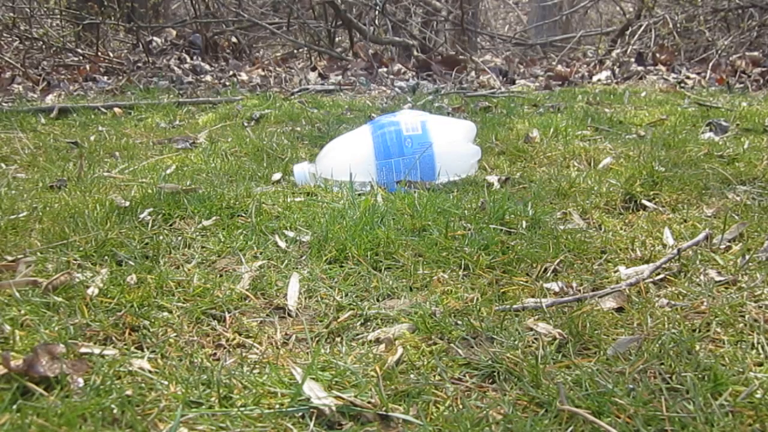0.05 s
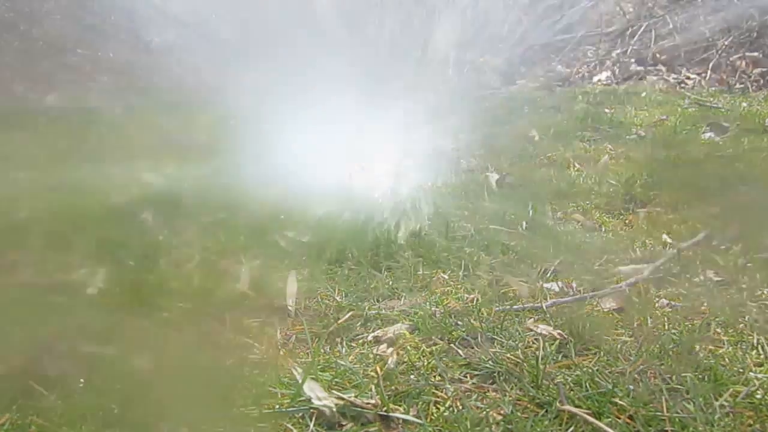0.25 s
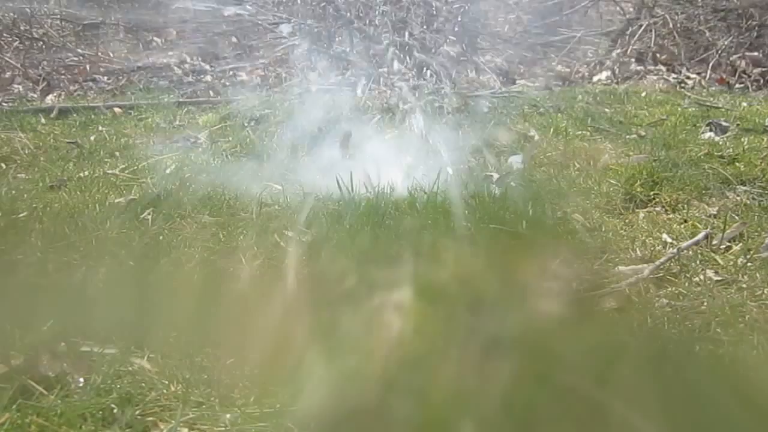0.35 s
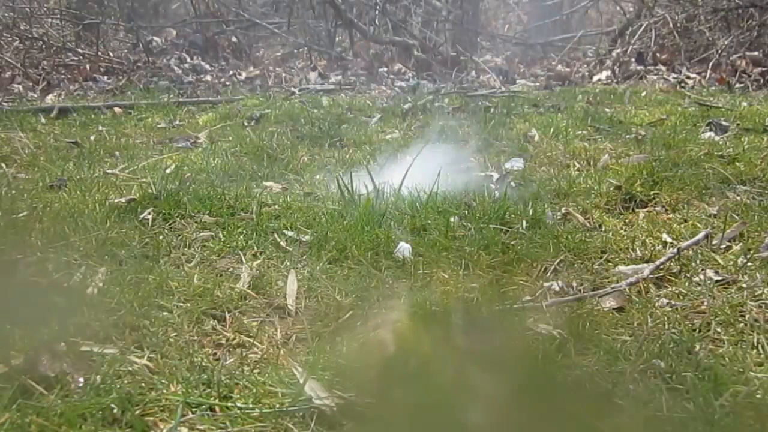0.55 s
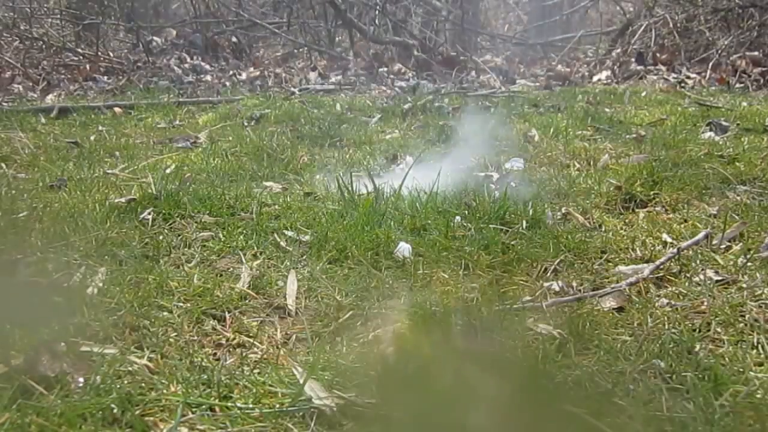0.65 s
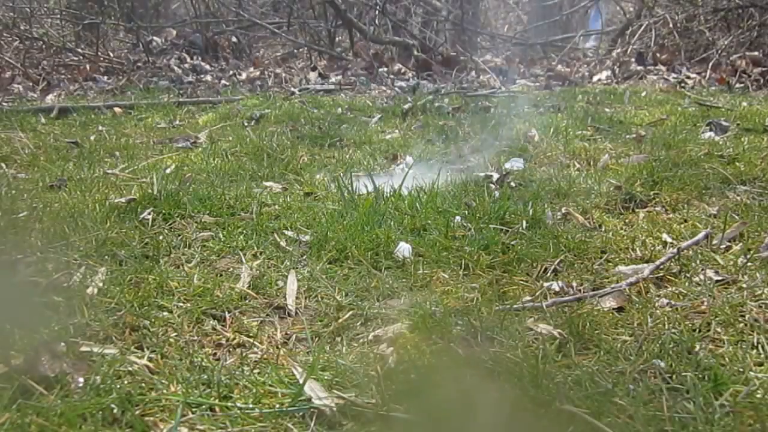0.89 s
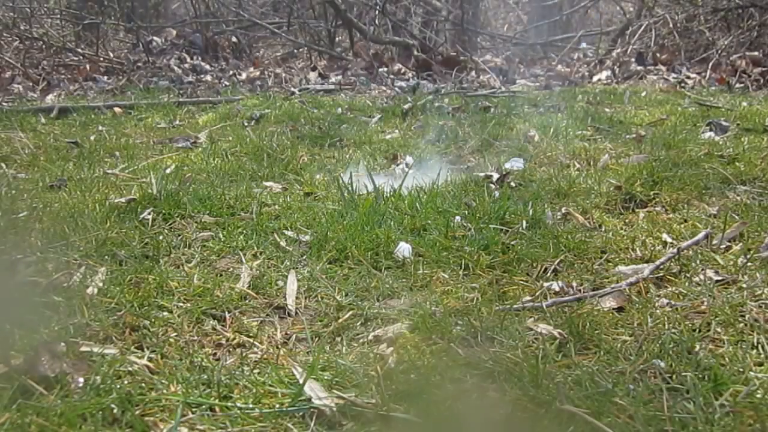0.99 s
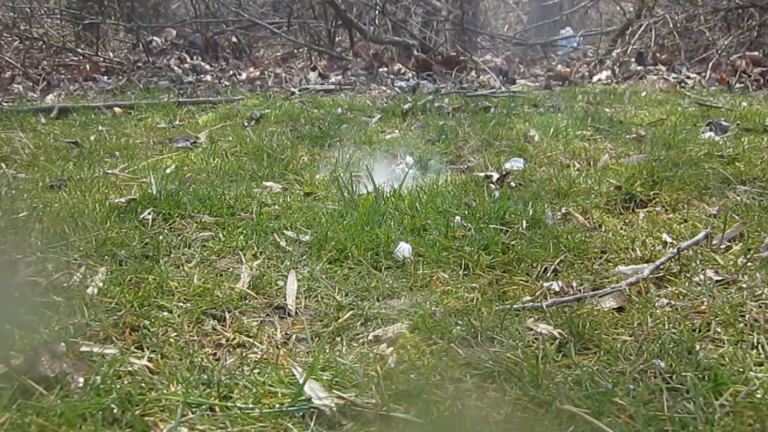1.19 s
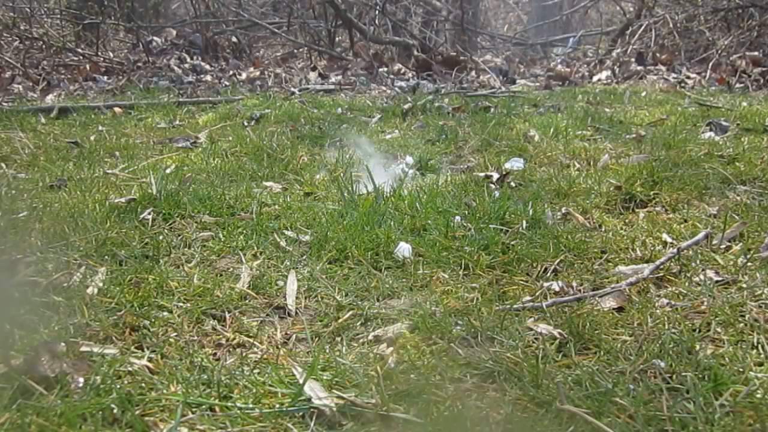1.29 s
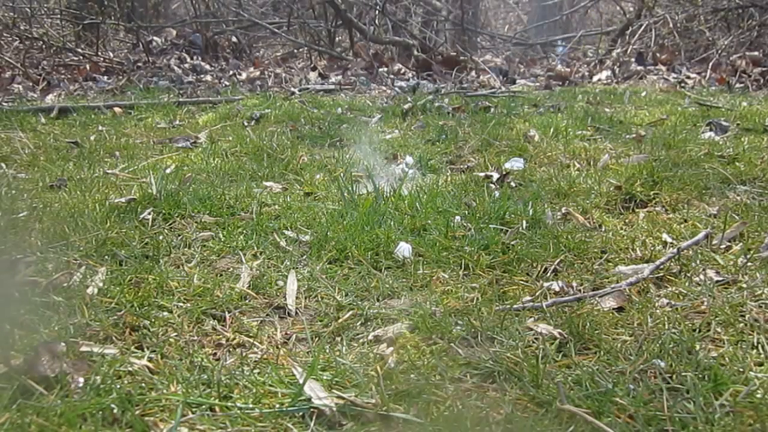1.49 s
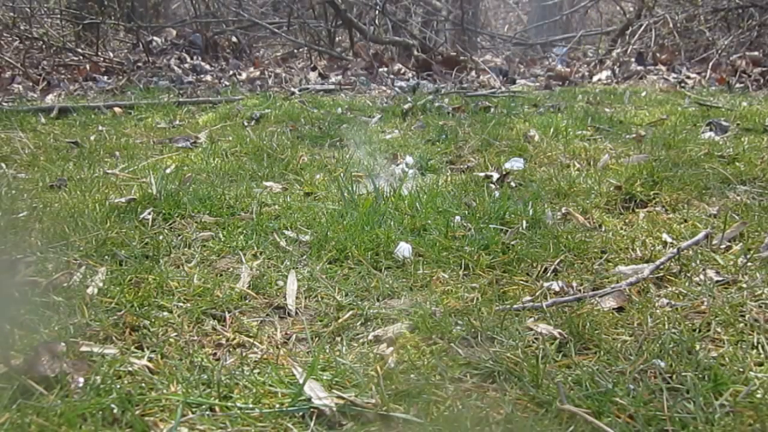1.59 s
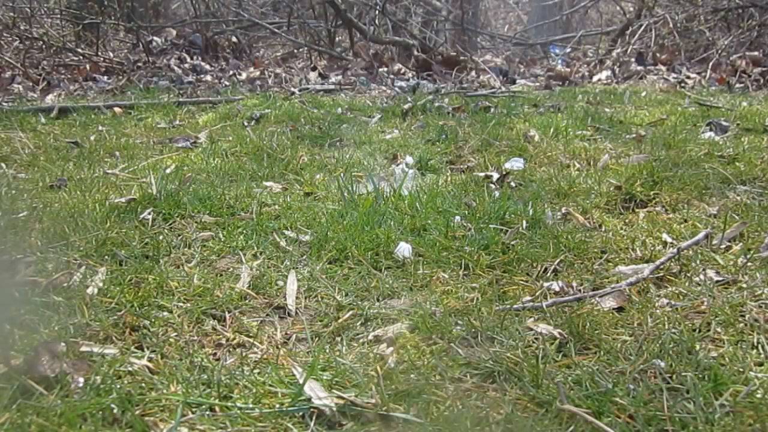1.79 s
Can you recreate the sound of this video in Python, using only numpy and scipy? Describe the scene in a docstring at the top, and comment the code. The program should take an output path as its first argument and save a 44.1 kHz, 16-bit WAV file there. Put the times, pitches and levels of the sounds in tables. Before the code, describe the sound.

Fast light ticks, then a plastic bottle explodes deafeningly on grass, leaving a dull rolling echo

```python
"""Bottle burst by a wood

A pressurised plastic bottle bursts on a lawn at the edge of a wood, after a short run of fast, even ticks close by.
The blast (noise plus a slow pressure swing) overloads the microphone and pins it silent for a moment.
A whack of fading tones follows, then scraps and drops click down as short bursts of filtered noise.
The echo, noise that loses its treble with time, rolls away through the trees with a few dull thuds."""
import sys
import numpy as np
from scipy import signal
from scipy.fft import rfft, irfft
from scipy.io import wavfile

SR = 44100
rng = np.random.default_rng(int(sys.argv[2]) if len(sys.argv) > 2 else 0)


def store_pcm(level_fs):
    """Save levels as 16-bit WAV."""
    pcm = np.round(np.clip(level_fs, -1, 1) * 32767).astype(np.int16)
    wavfile.write(sys.argv[1], SR, np.atleast_2d(pcm).T)


N = 81585  # length in samples
BURST_S, BLAST_END_S, BLAST_RELEASE_S = 0.2021, 0.306, 0.0024


def from_db(db):
    """Turn decibels into a plain multiplier."""
    return 10 ** (np.asarray(db) / 20)


def clock():
    """Time of every sample, in seconds."""
    return np.arange(N) / SR


def rms_one(x):
    """Scale a sound to an average strength (rms) of 1."""
    return x / np.sqrt(np.mean(x ** 2) + 1e-20)


def fade(start, length):
    """Start suddenly at 1, then die away exponentially."""
    age = clock() - start
    return (age >= 0) * np.exp(-np.maximum(age, 0) / length)


def until(end):
    """Full from the burst until the end, then a quick release."""
    t = clock()
    return (t >= BURST_S) * np.exp(-np.maximum(t - end, 0) / BLAST_RELEASE_S)


def noise(spectrum):
    """Noise with the given balance of bass and treble, rms 1."""
    hz, db = np.transpose(spectrum)
    bins = np.maximum(np.fft.rfftfreq(N, 1 / SR), 1)
    gain = from_db(np.interp(np.log(bins), np.log(hz), db))
    gain = gain * np.minimum(bins / hz[0], 1)  # falls away below the lowest listed frequency
    return rms_one(irfft(rfft(rng.standard_normal(N)) * gain, N))


def resonate(x, hz, width):
    """Pass a sound through one resonance that has gain 1 at its top."""
    r = np.exp(-np.pi * width / SR)
    feed = np.array([1, 0, -1]) * (1 - r * r) / 2
    feedback = [1, -2 * r * np.cos(2 * np.pi * hz / SR), r * r]
    return signal.lfilter(feed, feedback, x + 1e-18)  # the tiny offset avoids slow arithmetic


def narrow(x, hz, width):
    """Apply a resonance twice, for steep sides; rms 1."""
    return rms_one(resonate(resonate(x, hz, width), hz, width))


def narrow_noise(hz, width):
    """Fresh random noise gathered round one frequency, rms 1."""
    return narrow(rng.standard_normal(N), hz, width)


def clicks(per_s):
    """Random clicks of uneven size."""
    return (rng.random(N) < per_s / SR) * rng.standard_normal(N)


def lowpass(x, hz):
    """Soften everything above the given frequency."""
    return signal.sosfilt(signal.butter(2, hz, fs=SR, output="sos"), x)


AIR_DB, AIR_DIP_DB, AIR_RETURN_S = -56, 17, 0.45
MIST_DB, MIST_S, MIST_SPREAD_S, MIST_HZ = -71, 0.92, 0.1824, 5560
# balance of the steady outdoor air: f/Hz, relative level/dB
AIR_COLOUR = [(30, 23), (100, 12.5), (300, -5.5), (1000, -6.5), (2000, -2.5), (3200, -10.5), (5000, -15),
              (6800, -19), (8000, -10.5), (11000, -24), (16000, -32)]


def air():
    """Faint outdoor hiss and rumble that dips after the bang and creeps back, with a soft swell of falling mist."""
    swell = np.exp(-((clock() - MIST_S) / MIST_SPREAD_S) ** 2 / 2)
    mist = from_db(MIST_DB) * swell * narrow_noise(MIST_HZ, MIST_HZ / 2)
    air_level = from_db(AIR_DB - AIR_DIP_DB * fade(BLAST_END_S, AIR_RETURN_S))
    return air_level * noise(AIR_COLOUR) + mist


ECHO_DB, ECHO_GRAIN_DB = 0.5, 3  # overall trim; random unevenness from sample to sample
# how loud the rolling echo is, before the trim: t/s, level/dB
ECHO_ROLL = [(.29, -8.5), (.33, -17), (.4, -21.5), (.444, -26.5), (.495, -22), (.66, -27), (.74, -27.5),
             (.82, -29.5), (.88, -29), (1.1, -32), (1.16, -36), (1.325, -35), (1.354, -35), (1.45, -37),
             (1.8, -42.5), (1.85, -42)]
# balance of the echo and how it changes: f/Hz, relative level/dB at the blast's end, extra loss/(dB per s)
ECHO_COLOUR = [(30, -16, -16), (60, -17.5, -15), (107.4, -9.5, -6), (220, -3, 0), (395.4, 0.5, -1),
               (719.4, -3, 0), (935, -11, 0.5), (1243, -5.5, -2), (1338, -11, -2), (1720, -9.5, 7),
               (2230, -15, 20.5), (3600, -27.5, 36), (5330, -34, 57), (7600, -41, 108), (10000, -60, 117)]


def echo():
    """Countless reflections from the trees; the later they come, the more treble they have lost."""
    t = clock()
    age = np.maximum(t - BLAST_END_S, 0)
    hz, db, loss = np.transpose(ECHO_COLOUR)
    hiss = rng.standard_normal(N)
    grain = from_db(ECHO_GRAIN_DB * np.minimum(rng.exponential(1, N), 7))
    reflections = rfft(rms_one(hiss * grain))
    # overlapping frequency bands, one for each row of the table
    log_bins = np.log(np.maximum(np.fft.rfftfreq(N, 1 / SR), 1))
    bands = [np.interp(log_bins, np.log(hz), row) for row in np.eye(len(hz))]
    total = np.sqrt(np.mean((from_db(db) @ np.array(bands)) ** 2))
    out = np.zeros(N)
    for band, start_db, loss_per_s in zip(bands, db, loss):
        out += irfft(reflections * band, N) * from_db(start_db - loss_per_s * age)
    roll = from_db(ECHO_DB + np.interp(t, *np.transpose(ECHO_ROLL)))
    return out / total * (t > BURST_S) * roll


# distinct dull thuds in the echo: t/s at the middle of the wave, level/dB, f/Hz
ECHO_THUDS = [(0.32, -15, 55), (.412, -31, 57.6), (.741, -21.5, 558), (.863, -14.5, 503), (.985, -19, 544),
              (1.058, -36, 66), (1.348, -22, 348), (1.385, -33, 76.5), (1.406, -28.5, 260)]


def returns():
    """Dull thuds stand out of the echo, each a single rounded pressure wave."""
    out = np.zeros(N)
    for s, db, hz in ECHO_THUDS:
        cycles = (clock() - s) * hz
        out -= from_db(db) * np.sin(2 * np.pi * cycles) * np.exp(-cycles ** 2)
    return out


DEBRIS_TOP_RATIO = 0.68  # a scrap's click dulls above this multiple of its frequency


def scrap(hz, width):
    """The sound of one scrap: a broad resonance with a dulled top; rms 1."""
    click = resonate(rng.standard_normal(N), hz, width)
    return rms_one(lowpass(click, min(hz * DEBRIS_TOP_RATIO, 0.45 * SR)))


DROPS_PER_S, DROPS_DB, DROPS_FALL_DB_PER_S = 260, -53, 146
# faint late crackle in the grass
SETTLE_PER_S, SETTLE_DB, SETTLE_FROM_S, SETTLE_RISE_S = 200, -75, 1.05, 0.5
# scraps and drops landing: t/s, level/dB, f/Hz, width/Hz, fade/s
LANDINGS = [(0.3316, -20, 3960, 4000, 0.0019), (0.3586, -16.5, 4840, 6000, 0.0012),
            (0.365, -29, 8000, 5000, .0008), (.3735, -65, 13000, 6000, .0005),
            (.3912, -34, 4500, 4440, 0.00069), (0.4468, -48, 10360, 7000, 0.00058),
            (.4752, -39, 6440, 5000, 0.00039), (.536, -38, 5450, 1200, 0.0044)]


def debris():
    """Single scraps click on the ground amid a quickly fading spray of drops; later the grass crackles faintly."""
    t = clock()
    scraps = np.zeros(N)
    for s, db, hz, width, length in LANDINGS:
        scraps += from_db(db) * fade(s, length) * scrap(hz, width)
    age = t - BLAST_END_S
    spray_level = (age > 0) * from_db(DROPS_DB - DROPS_FALL_DB_PER_S * np.abs(age))
    spray = spray_level * narrow(clicks(DROPS_PER_S), 7000, 6000)
    settle_rise = np.clip((t - SETTLE_FROM_S) / SETTLE_RISE_S, 0, 1)
    settling = settle_rise * from_db(SETTLE_DB) * narrow(clicks(SETTLE_PER_S), 5120, 5130)
    return scraps + spray + settling


TICK_DB, TICK_FADE_S = -30, 0.0042
TICK_RATTLE_DB, TICK_RATTLE_S = -25, 0.014  # rattle level is relative to its tick
TICK_CONTACT_DB, TICK_CONTACT_S = -36.5, 0.0014
# fast ticks before the burst: t/s, relative level/dB
TICK_TIMES = [(0.0002, 2), (0.0266, -1), (0.0415, -5), (0.0528, 3), (0.0808, 1), (0.1049, 1.5), (0.1319, 5),
              (0.1478, -13.5), (0.1588, 2), (0.1815, -8), (0.1846, -1)]
# what the ticks ring with: f/Hz, width/Hz, relative level/dB
TICK_RESONANCES = [(1977, 300, -1), (2700, 440, -8), (3670, 350, 0.5), (4660, 500, 0), (5400, 550, 2.5),
                   (6670, 450, -1.5), (7800, 600, -2), (8910, 900, -3.5), (10580, 470, -2.5)]
# balance of the dry contact of a tick: f/Hz, relative level/dB
CONTACT_COLOUR = [(300, -15.5), (1500, -12), (4000, -20), (7500, 4), (11000, 4.5), (13000, -5),
                  (17000, -18)]


def ticking():
    """Each tick is a short scrape with a faint rattle, in one small bright body, plus a dry contact noise."""
    force, touch = np.zeros(N), np.zeros(N)
    for s, db in TICK_TIMES:
        rattle = from_db(TICK_RATTLE_DB) * fade(s, TICK_RATTLE_S)
        force += from_db(db) * (fade(s, TICK_FADE_S) + rattle)
        touch += from_db(db) * fade(s, TICK_CONTACT_S)
    drive = force * rng.standard_normal(N)
    body = np.zeros(N)
    for k, (hz, width, db) in enumerate(TICK_RESONANCES):
        body += (-1) ** k * from_db(db) * resonate(drive, hz, width)  # neighbours have opposite signs
    return from_db(TICK_DB) * body + from_db(TICK_CONTACT_DB) * touch * noise(CONTACT_COLOUR)


WHACK_ROUGH, WHACK_TOP_HZ = 0.33, 4500  # share of buzz; treble limit
SNAP_DB, SNAP_S, SNAP_HZ = -6, 0.00047, 5360  # bright snap that opens the first whack
# ringing whacks of the torn shell: t/s, level/dB of the tone at its start, f/Hz, time to fall by 60 dB/s
SHELL_WHACKS = [(.2962, 8, 1270, .036), (.3032, 6, 1680, .012), (.3226, 1, 1300, .013),
                (.4998, -10, 2050, .015)]


def whacks():
    """Pieces of shell ring briefly, with a rough buzz round their pitch."""
    out = np.zeros(N)
    for s, db, hz, t60 in SHELL_WHACKS:
        tone = np.sin(2 * np.pi * hz * (clock() - s))
        buzz = narrow_noise(hz, hz / 2)
        out += from_db(db) * fade(s, t60 / np.log(1000)) * (tone + WHACK_ROUGH * buzz)
    snap = from_db(SNAP_DB) * fade(SHELL_WHACKS[0][0], SNAP_S) * narrow_noise(SNAP_HZ, SNAP_HZ / 2)
    return lowpass(out, WHACK_TOP_HZ) + snap


JET_DB, JET_FALL_DB_PER_S, CRACK_DB, CRACK_S = -5, 139, 4.5, 0.003
TEAR_DB, TEAR_HZ, TEAR_WIDTH_HZ = -8, 1900, 3000
ROAR_DB, ROAR_RISE_S, ROAR_FALL_DB_PER_S, ROAR_END_S = 4.5, 0.035, 49.5, 0.269
# balance of the tearing jet of gas: f/Hz, relative level/dB
JET_COLOUR = [(100, -10), (600, 10), (2000, -5), (4000, -3), (7000, 2.5), (11000, -7.5), (16000, -19)]
# balance of the roar behind it: f/Hz, relative level/dB
ROAR_COLOUR = [(30, -12), (120, -12.5), (250, -4), (420, -3.5), (700, -3), (1200, -8.5), (2500, -26.5),
               (6000, -44)]
# slow pressure swing on the diaphragm: t/s, pressure/full scales
PRESSURE_SWING = [(.2708, 0), (.2722, 6), (.279, 5), (.2818, .95), (.286, .95), (.2885, 1.25), (.2925, .95),
                  (.2948, 1.15), (.2962, 0)]


def blast():
    """A crack and a bright jet give way to a low roar while the plastic rips; a slow pressure swing follows."""
    age = np.maximum(clock() - BURST_S, 0)
    jet_level = from_db(JET_DB - JET_FALL_DB_PER_S * age)
    crack_level = from_db(CRACK_DB) * fade(BURST_S, CRACK_S)
    jet = noise(JET_COLOUR) * (jet_level + crack_level)
    tear = from_db(TEAR_DB) * narrow_noise(TEAR_HZ, TEAR_WIDTH_HZ)
    roar_level = from_db(ROAR_DB - ROAR_FALL_DB_PER_S * age) * (1 - np.exp(-age / ROAR_RISE_S))
    roar = noise(ROAR_COLOUR) * roar_level
    swing = np.interp(clock(), *np.transpose(PRESSURE_SWING), left=0, right=0)
    return until(BLAST_END_S) * (jet + tear) + until(ROAR_END_S) * roar + swing


def scene():
    """Everything that reaches the microphone, as one channel."""
    bottle = ticking() + blast() + whacks() + debris()
    return (bottle + echo() + returns() + air())[None]


def saturate(x, top):
    """Clean at low level, flat at the top."""
    return x / (1 + (x / top) ** 4) ** (1 / 4)


MIC_TOP, AMPLIFIER_TOP = 0.41, 0.61  # highest levels each can pass, in full scales
COUPLING_HZ, CUTOFF_HZ = 176, 17700


def record(dry):
    """The microphone saturates, its coupling drains steady pressure, the amplifier rounds the peaks, the top is cut."""
    coupling = signal.butter(1, COUPLING_HZ, "high", fs=SR, output="sos")
    x = signal.sosfilt(coupling, saturate(dry, MIC_TOP))
    top_cut = signal.cheby2(12, 70, CUTOFF_HZ, fs=SR, output="sos")
    return signal.sosfilt(top_cut, saturate(x, AMPLIFIER_TOP))


dry = scene()
out = record(dry)
store_pcm(out)
```